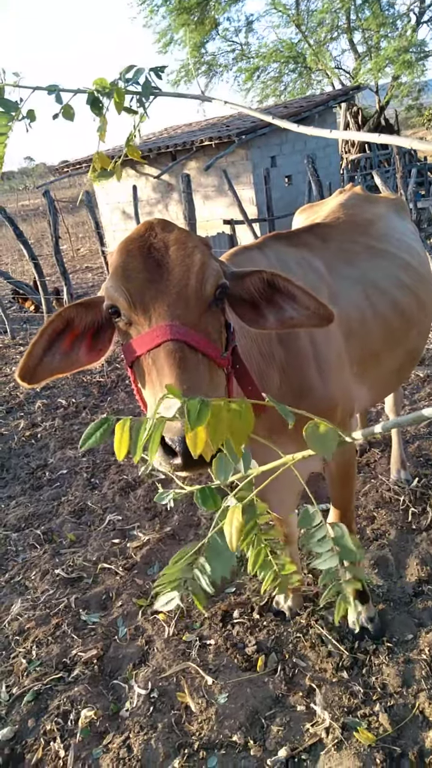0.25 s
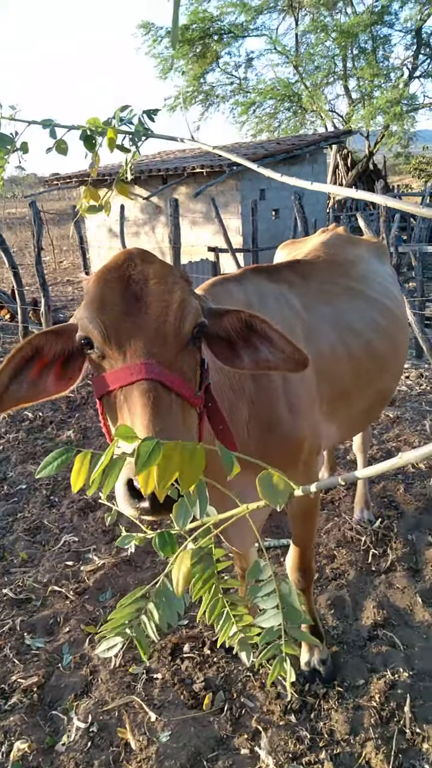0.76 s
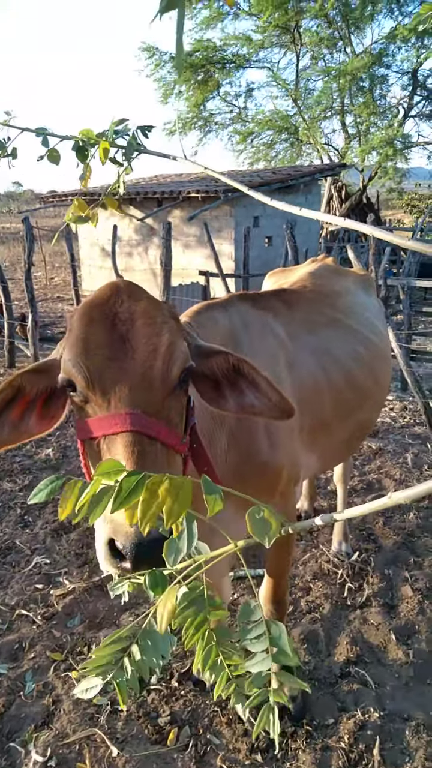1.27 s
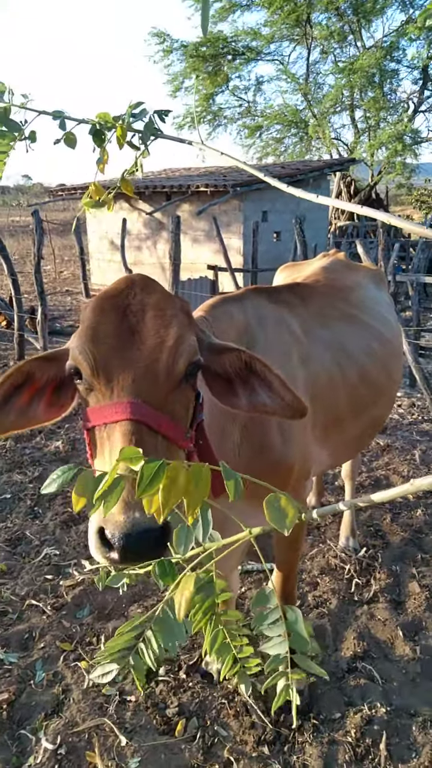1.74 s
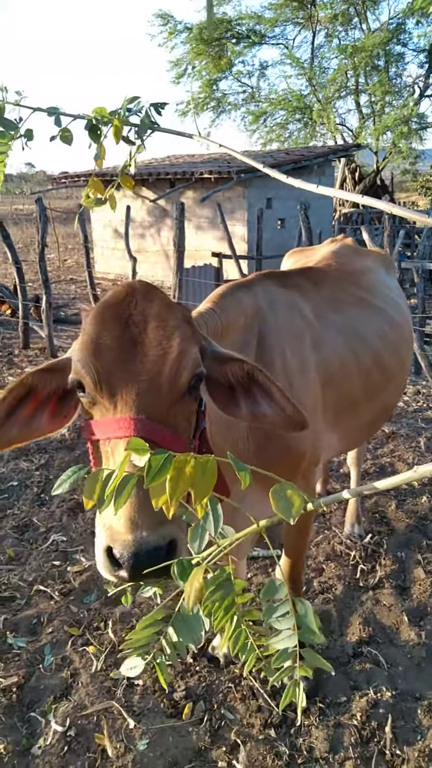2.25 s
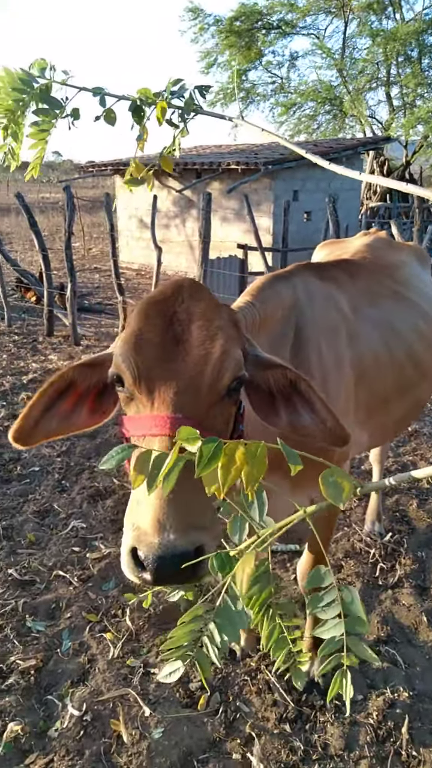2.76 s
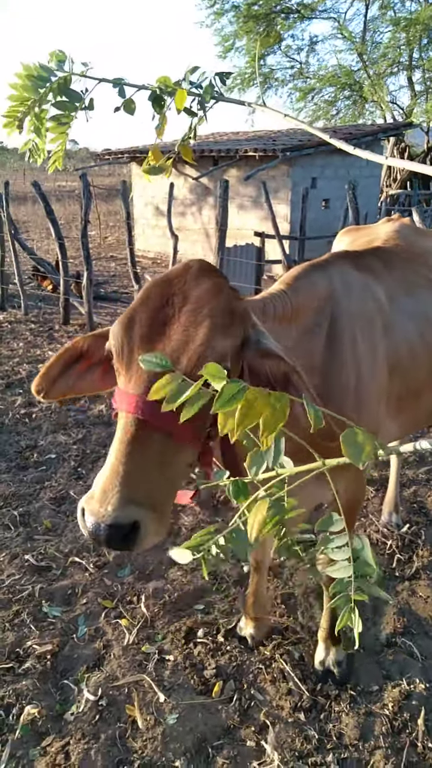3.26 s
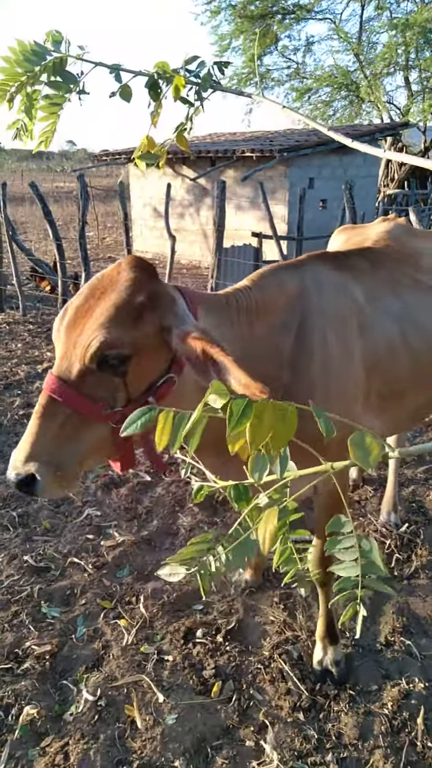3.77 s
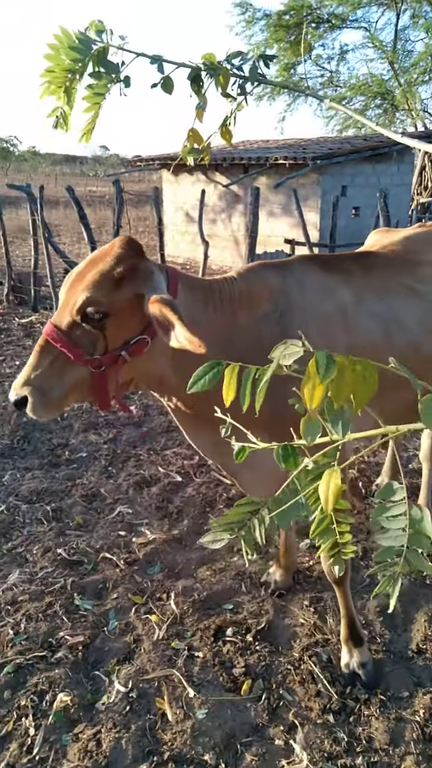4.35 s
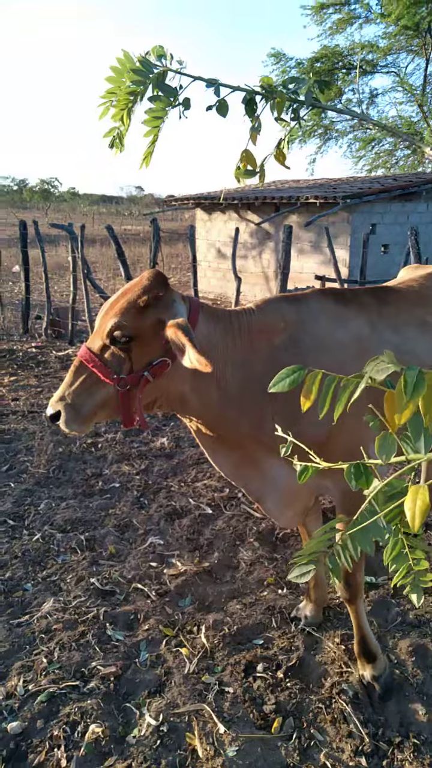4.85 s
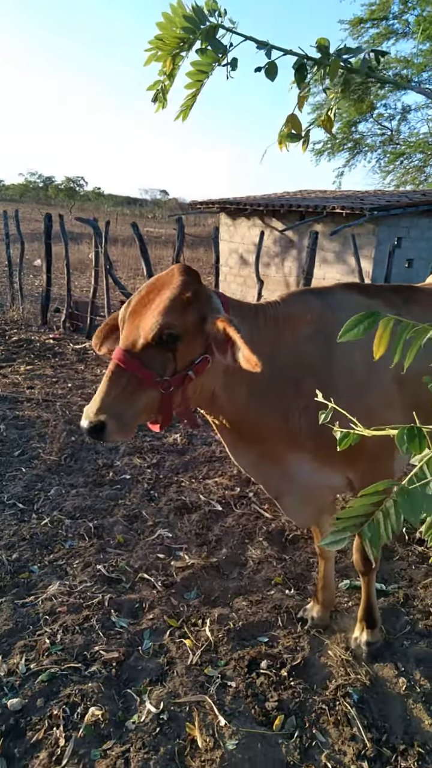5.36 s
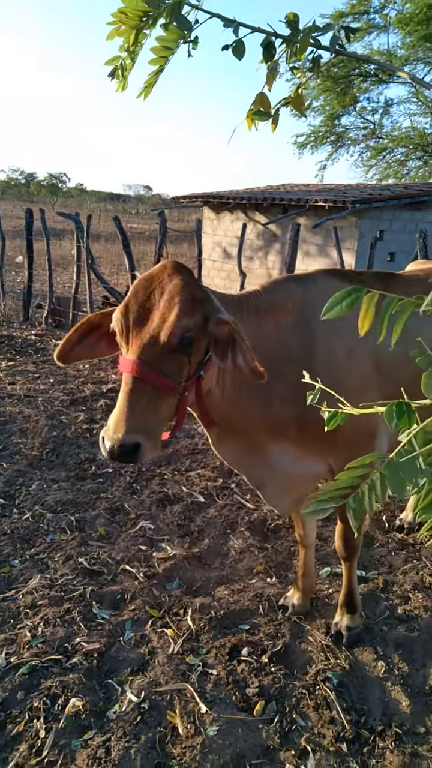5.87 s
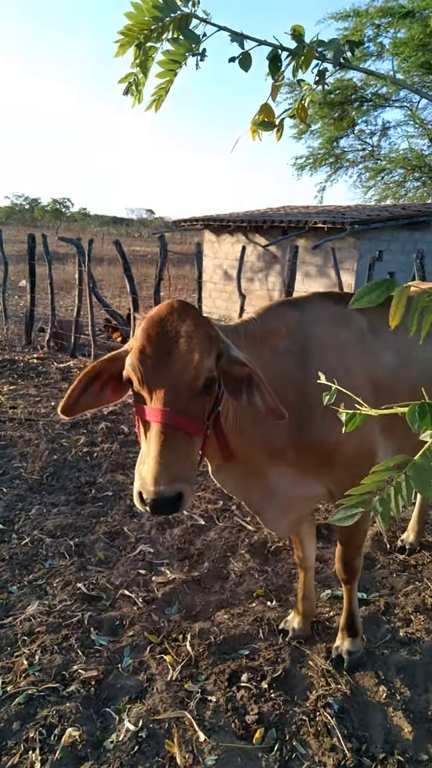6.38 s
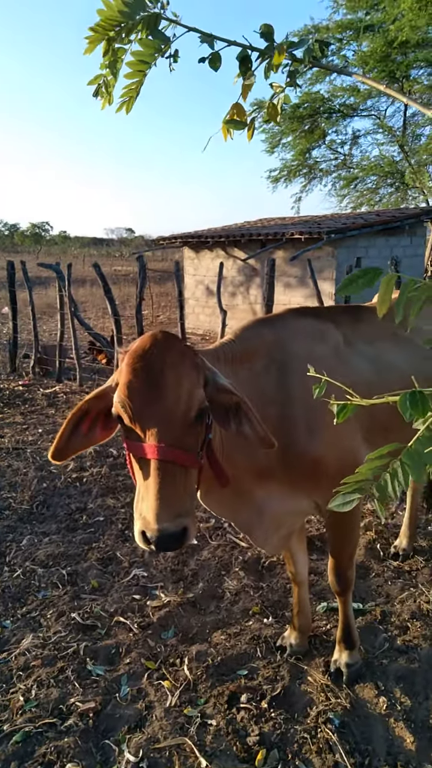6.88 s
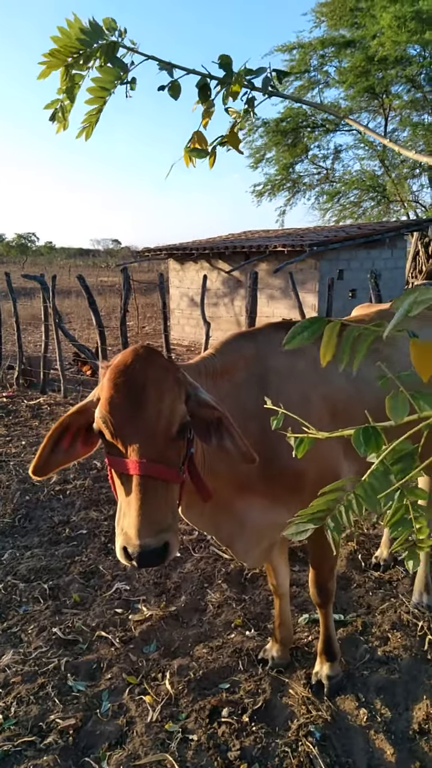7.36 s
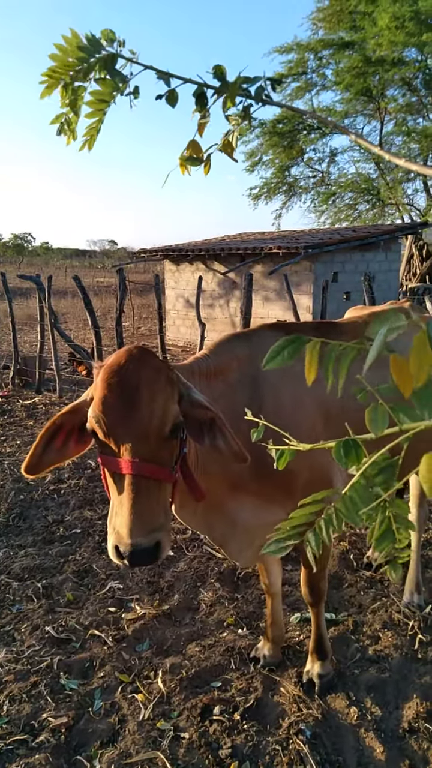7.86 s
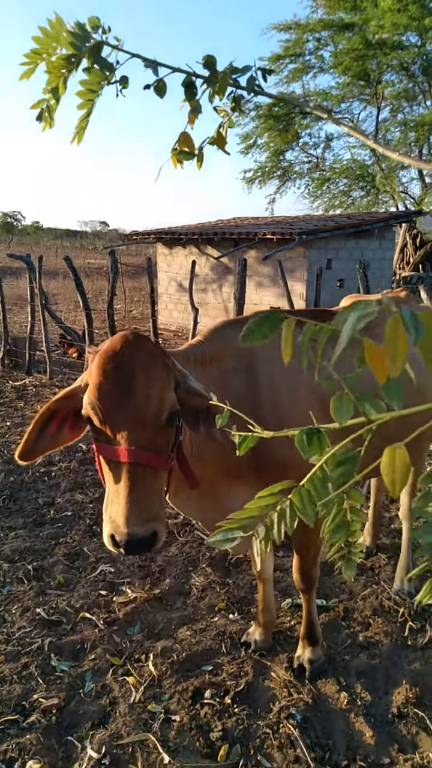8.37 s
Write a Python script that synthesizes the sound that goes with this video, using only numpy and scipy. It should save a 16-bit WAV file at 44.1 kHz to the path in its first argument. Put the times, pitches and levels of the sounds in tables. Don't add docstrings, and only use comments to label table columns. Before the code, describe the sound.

Dry leaves crackle and stems knock beside a wind-buffeted phone microphone as an accelerating bird trill and buzzing calls echo from trees.

```python
import sys
import numpy as np
from scipy import signal
from scipy.fft import rfft, irfft, next_fast_len
from scipy.io import wavfile
from scipy.ndimage import uniform_filter1d

SR = 44100
rng = np.random.default_rng(int(sys.argv[2]) if len(sys.argv) > 2 else 0)


def boost_factor(decibels):
    exponent = np.asarray(decibels, float) / 20
    return 10 ** exponent


def put_to_file(sound):
    columns = np.atleast_2d(sound).T
    safe = np.clip(columns, -1, 1)
    whole_steps = np.round(safe * 32767)
    wavfile.write(sys.argv[1], SR, whole_steps.astype(np.int16))


N = 380141


def colour(x, points):
    size = next_fast_len(len(x))
    hz, db = np.transpose(points)
    bins_hz = np.arange(size // 2 + 1) * SR / size
    gain = boost_factor(np.interp(np.log(bins_hz + 1), np.log(hz), db, -120, -120))
    return irfft(rfft(x, size) * gain, size)[:len(x)]


def band(x, lo_hz, hi_hz, order=2):
    return signal.sosfilt(signal.butter(order, [lo_hz, min(hi_hz, .45 * SR)], "band", fs=SR, output="sos"), x)


def unit(x):
    return x / np.sqrt(np.mean(x ** 2))


def walk(rate):
    k = int(SR / rate)
    steps = np.repeat(rng.standard_normal(N // k + 1), k)
    return unit(uniform_filter1d(steps, k)[:N])


def add(out, s, sound):
    i = max(int(s * SR), 0)
    out[i:i + len(sound)] += sound[:N - i]


def swells(rows, rise_db_s, fall_db_s, rest_db):
    t = np.arange(0, N + 64, 64) / SR
    s, hold, db = np.transpose(rows)[:3, :, None]
    before, after = np.clip(s - t, 0, None), np.clip(t - s - np.abs(hold), 0, None)
    db = db - rise_db_s * before - fall_db_s * after
    return boost_factor(np.vstack([rest_db + 0 * t, db])) ** 2


def spread(v):
    return np.interp(np.arange(N) / 64, np.arange(len(v)), v)


def total_db(power):
    return spread(10 * np.log10(power.sum(axis=0)))


def leaves(db, bright_db, ring_hz):
    # frequency in Hz, density in dB per Hz.
    leaf = [(1200, -19.5), (1550, -14), (2000, -14.5), (3000, -10.5), (4200, -10.5), (6000, -4.5),
            (7900, -4), (11000, -7), (15900, -6)]
    bursts_db = 1.6 * rng.exponential(size=N // 40 + 1).clip(0, 6).repeat(40)[:N]
    grains = boost_factor(bursts_db + .8 * walk(45))
    hz, s, cells = signal.stft(unit(grains * rng.standard_normal(N)), SR, nperseg=512)
    at = np.minimum((s * SR).astype(int), N - 1)
    db, bright_db, ring_hz = db[at], bright_db[at], ring_hz[at]
    hz = hz[:, None]

    quiet = np.clip((-56.0 - db) / 11, 0, 1)
    treble_db = (bright_db + 5.0) * np.clip((hz - 9000) / 3000, 0, 1)
    sunk_db = 11 * quiet * np.clip((6500 - hz) / 2500, 0, 1)

    luck = uniform_filter1d(rng.standard_normal((65, len(s))), size=22, axis=1)
    luck = unit(luck + .8 * uniform_filter1d(luck, size=5, axis=0))
    luck = luck.repeat(4, axis=0)[:len(hz)]
    ring = np.exp(-(np.log((hz + 1) / ring_hz) / 0.12) ** 2)
    streak_db = (2 + 10.9 * quiet) * (np.tanh(3 * luck + 2.77 * ring) - .6) + 3.6 * ring

    leaf_hz, leaf_db = np.transpose(leaf)
    shape_db = np.interp(np.log(hz + 1), np.log(leaf_hz), leaf_db, -60, -60)
    level_db = db + shape_db + treble_db - sunk_db + streak_db + 7.5
    return signal.istft(cells * boost_factor(level_db), SR)[1][:N]


def snaps():
    # time in seconds, level
    # in dB, # dull part in dB, ring in Hz.
    ticks = [(1.22, -55, -9, 9300), (2.443, -55, -2, 6960), (2.686, -71, -20, 5330),
             (2.733, -70, -18, 5250), (3.656, -45.5, -31, 12500), (3.711, -45, -18, 7400),
             (3.998, -29, -9, 8700), (4.309, -54, -10, 8400), (4.557, -43, -20, 8560),
             (4.851, -60, -18, 7560), (4.866, -46, -18, 8300), (4.902, -49, -13, 8000),
             (4.938, -44, -5.5, 9900), (4.988, -40.5, -13, 7600), (5.064, -41, -13, 9700),
             (5.098, -47.5, -22, 9700), (5.303, -56, -28, 8800), (6.328, -46, -35, 8700),
             (6.339, -46, -35, 8750), (6.596, -53, -11, 6960), (7.073, -63, -25, 8500),
             (7.563, -49, -18, 7400), (7.564, -45, -6, 6960), (7.605, -42, -8, 7600),
             (7.821, -57, -25, 12000), (7.921, -55, -22, 12500), (8.268, -44.5, -8, 9000),
             (8.473, -45, -22, 5600), (8.55, -39, -18, 8300), (8.584, -42.5, -11, 6660),
             (8.608, -41, -25, 8800), (8.616, -39.5, -14, 6300)]
    out, t = np.zeros(N), np.arange(300) / SR
    noises = rng.standard_normal((len(ticks), len(t)))
    for (s, db, dull_db, ring_hz), noise in zip(ticks, noises):
        crack = noise * (1 - np.exp(-t / .0003)) * np.exp(-t / 0.0015)
        ring = unit(band(crack, ring_hz / 1.186, ring_hz * 1.175, order=3))
        bright = .42 * unit(band(crack, 4600, 15500))
        dull = boost_factor(dull_db) * unit(band(crack, 1700, 6800))
        add(out, s - .0007, boost_factor(db - 7.5) * (ring + bright + dull))
    return out


def branch(db):
    # time in seconds, level in dB, hardness in dB.
    knocks = [(0.134, -51.5, -32), (0.287, -63, -28), (.396, -69, -28), (0.476, -49.5, -43.5),
              (1.024, -66, -5), (1.221, -40, -23), (2.415, -57, -29), (2.444, -65.5, -12),
              (2.529, -46, -42), (2.536, -50.5, -32), (2.564, -40, -45), (2.603, -37, -46),
              (2.643, -44, -41), (2.687, -44, -32), (2.734, -37, -43.5), (2.763, -43, -35),
              (2.795, -42, -40), (3.448, -65.5, -38), (3.502, -57.5, -33), (3.999, -45, -15.5),
              (4.017, -54.5, -15.5), (4.172, -50, -35.5), (4.249, -42.5, -31), (4.285, -43.5, -18.5),
              (4.312, -44, -17.5), (4.524, -52, -35), (4.558, -50.5, -18), (4.936, -62, -7),
              (5.069, -60.5, -23), (5.122, -60.5, -21), (7.197, -64.5, -12)]
    out = boost_factor(db - 9.0 + 5.5 * walk(30)) * unit(band(rng.standard_normal(N), 130, 776, order=4))
    t = np.arange(900) / SR
    for (s, knock_db, hard_db), (pitch, side) in zip(knocks, rng.random((len(knocks), 2))):
        push = 1 - np.exp(-(t * boost_factor(0.64 * hard_db) / 0.00022) ** 2)
        low = np.sin(2 * np.pi * (260 + 90 * pitch) * t) * np.exp(-t / 0.0017)
        wood = 0.35 * np.sin(2 * np.pi * (470 + 100 * side) * t) * np.exp(-t / 0.0023)
        high = np.sin(2 * np.pi * (1350 + 400 * pitch) * t) * np.exp(-t / 0.0017)
        hard = boost_factor(1.38 * hard_db + 8.0) * (1 - np.exp(-t / 0.00012)) * high
        add(out, s - .001, boost_factor(knock_db + 16.5) * np.sign(side - .5) * ((low + wood) * push + hard))
    return out


def wind(db):
    # time in seconds, level in dB, swing in Hz.
    puffs = [(0.187, -45.5, 85), (0.24, -45, 88), (0.307, -42, 84.4), (0.359, -54, 99.5),
             (0.451, -44.5, 78), (0.473, -33.5, 109), (0.613, -37.5, 95), (0.644, -41, 80),
             (0.749, -44.5, 70), (.795, -43, 86), (0.825, -45, 96), (0.854, -47.5, 90), (1.023, -51, 96),
             (1.194, -37.5, 89.5), (1.243, -40, 102), (1.259, -40.5, 113), (1.808, -40.5, 114),
             (2.126, -44.5, 68), (2.418, -53, 66), (3.058, -35.5, 99), (3.241, -46.5, 65), (3.254, -47, 80),
             (3.545, -46.5, 72), (3.665, -55.5, 72), (3.822, -51.5, 73.5), (4.284, -50.5, 150),
             (4.975, -48, 71), (5.059, -49.5, 80), (5.18, -43.5, 70), (5.232, -43.5, 70.7),
             (5.776, -54, 75), (8.187, -44.5, 100), (8.224, -43.5, 81), (8.338, -39.5, 89),
             (8.352, -43, 110), (8.379, -45.5, 80), (8.431, -48.5, 65)]
    # frequency in Hz, density in dB per Hz.
    port = [(15, -29), (30, -18), (70, 1.5), (97, 1), (240, -19), (430, -39), (900, -63.5)]
    out = boost_factor(db + 3.8 * walk(24)) * unit(colour(rng.standard_normal(N), port))
    t = np.arange(-1500, 1500) / SR
    for (s, blow_db, swing_hz), turn in zip(puffs, rng.random(len(puffs))):
        swing = np.exp(-(t / 0.0058) ** 2) * np.cos(2 * np.pi * (swing_hz * t + turn))
        add(out, s + t[0], boost_factor(blow_db + 2.5) * swing)
    return out


def singer():
    # start in seconds, length in seconds, top pitch in Hz, level in dB.
    notes = [(1.452, 0.02, 1570, -79.5), (1.532, 0.025, 1650, -78), (1.628, 0.024, 1540, -75.5),
             (1.734, 0.023, 1580, -78.5), (2.834, 0.093, 2297, -72), (3.209, 0.133, 2300, -66.5),
             (3.713, 0.137, 2280, -63), (4.197, 0.12, 2321, -57), (4.599, 0.15, 2230, -62.5),
             (5, 0.12, 2218, -62.5), (5.393, 0.118, 2130, -61.5), (5.745, 0.11, 2183, -60.5),
             (6.064, 0.1, 2204, -60.5), (6.364, 0.105, 2170, -61), (6.676, 0.105, 2115, -62),
             (6.97, 0.098, 2180, -61), (7.233, 0.093, 1930, -62), (7.469, 0.074, 1900, -62),
             (7.654, 0.068, 1800, -60), (7.833, 0.051, 1733, -56), (7.966, 0.033, 1603, -59),
             (8.087, 0.032, 1585, -59), (8.174, 0.031, 1516, -60), (8.292, 0.035, 1440, -63),
             (8.382, 0.022, 1364, -67.5), (8.444, .018, 1210, -75)]
    arch = [(0, .6), (.1, .87), (.2, 1.0), (.45, .93), (.86, .83), (1, .58)]
    pickup_from_s = 5.2
    out = np.zeros(N)
    for s, length, hz, db in notes:
        share = np.linspace(0, 1, int(length * SR))
        hump = np.interp(length, [.04, .08], [1, 0])
        arched = np.interp(share, *np.transpose(arch))
        rounded = 1 - 0.883 * (share - .4) ** 2
        phase = 2 * np.pi * np.cumsum(hz * ((1 - hump) * arched + hump * rounded)) / SR

        top = np.interp(length, [.07, .1], [.9, .2])
        swell = np.interp(share, [0, .07, .16, .42, .5, .93, 1], [0, .3 + top, top, top, 1, .8, 0])
        if s < pickup_from_s and length > .07:
            swell = np.interp(share, [.24, .32, .5, .93, 1], [0, .45, 1, .8, 0])
        swell = swell * np.sin(np.pi * share) ** (hump / 2)

        octave = (0.21 + 95 * length ** 2) * boost_factor(0.92 * (db + 62.0))
        mouth = np.interp(share, [0, .05, .12, .2, .4, .5, .85, 1], [0, .3, 1, .25, .3, 1, .8, .1])
        second = octave * np.maximum(mouth, hump) * np.sin(2 * phase)
        third = .004 * octave ** 4 * np.sin(3 * phase)
        add(out, s, boost_factor(db + 2.5) * swell * (np.sin(phase) + second + third))
    return out * (boost_factor(1.8 * walk(90)) + .33 * walk(400))


def buzzer():
    # start in seconds, length in seconds, throat resonance in Hz, level in dB,
    # high resonance in dB.
    buzzes = [(0.288, 0.11, 3650, -68, -30), (0.42, 0.039, 3660, -84, -24), (0.756, 0.13, 3935, -66, -24),
              (1.262, 0.11, 3150, -60, -16), (1.437, 0.026, 3260, -65, -28),
              (1.528, 0.015, 3250, -61.5, -22), (1.623, 0.026, 3253, -64, -37),
              (1.733, 0.022, 3120, -66.5, -34), (1.765, 0.086, 3130, -56.5, -20.5),
              (1.946, 0.026, 3236, -62, -18), (2.065, 0.029, 3080, -61, -13),
              (2.231, 0.23, 3140, -58, -14.5), (2.632, 0.028, 3300, -63, -24),
              (2.758, 0.15, 3100, -56.5, -22.5), (3.247, 0.086, 3146, -54.5, -21),
              (3.674, 0.2, 2910, -58, -11), (4.182, 0.083, 2915, -55.5, -2.5),
              (4.608, 0.15, 2960, -59, -12.5), (5.095, 0.066, 2975, -58, -12),
              (5.537, 0.074, 3040, -54, -22), (5.988, 0.087, 3010, -54.5, -17.5),
              (6.449, 0.073, 2980, -56, -24), (6.911, 0.1, 2950, -60.5, -11),
              (7.368, 0.092, 3000, -58, -13), (7.844, 0.11, 2850, -66, -0.5),
              (8.268, 0.094, 2900, -69, -20)]
    out = np.zeros(N)
    cycle = np.cumsum(337 * (1 + .006 * walk(6) + .011 * walk(150))) / SR
    pulses = np.diff(np.floor(cycle), prepend=0) * boost_factor(2.8 * walk(200))
    source = unit(pulses) + 0.5 * np.exp(-(cycle % 1) / 1.3) * rng.standard_normal(N)
    for s, length, hz, db, high_db in buzzes:
        i, t = int(s * SR), np.arange(int(length * SR)) / SR
        raw = source[i:i + len(t)]
        throb = 1 + .3 * np.sin(2 * np.pi * 56 * t)
        breath = raw * np.sin(np.pi * t / length) ** 1.3 * throb
        voice = band(breath, hz - 130, hz + 130, order=2)
        voice = voice + 0.5 * band(breath, hz + 200, hz + 500, order=2)
        voice = voice + 0.2 * band(breath, hz - 300, hz + 850, order=5)
        voice = voice + boost_factor(high_db) * band(breath, 5070, 5650, order=4)
        opening = t / 0.0099 * np.exp(1 - t / 0.013) * band(raw, hz + 700, hz + 1700, order=3)
        add(out, s, boost_factor(db) * unit(voice + .05 * opening))
    return out


def whistler():
    # start in seconds, length in seconds, first pitch in Hz, last pitch in Hz, level in dB.
    whistles = [(0.0, 0.16, 3700, 3550, -75.5), (0.585, 0.05, 2944, 3060, -80.5),
                (0.52, 0.021, 4120, 4030, -89), (0.62, 0.015, 1620, 1790, -81.5),
                (0.703, 0.018, 1710, 1750, -82.5), (5.253, 0.034, 2924, 4060, -71),
                (0.918, 0.24, 4050, 3720, -81), (1.084, 0.03, 3730, 3000, -78.5),
                (1.667, 0.047, 3300, 3750, -78.5), (1.712, 0.083, 3730, 3800, -78.5),
                (3.046, 0.034, 3526, 3530, -78.5), (3.107, 0.063, 3680, 3670, -82.5),
                (3.75, 0.037, 3660, 3660, -67), (5.619, 0.23, 4420, 4400, -86),
                (4.106, 0.03, 2510, 2630, -75), (4.129, 0.019, 2600, 3050, -76),
                (4.562, 0.076, 2410, 3300, -74), (5.01, 0.042, 2745, 2440, -69),
                (5.41, 0.04, 2740, 2460, -63.5), (5.762, 0.034, 2700, 2440, -62),
                (6.066, 0.013, 3500, 4000, -64.5), (6.323, 0.038, 2630, 3480, -79.5),
                (1.757, 0.077, 7400, 7480, -85), (8.243, 0.039, 3410, 3110, -72),
                (7.258, 0.021, 2480, 2410, -68), (6.634, 0.048, 2600, 2980, -76),
                (6.671, 0.017, 3000, 3930, -73.5), (6.699, 0.034, 2570, 2430, -63.5),
                (6.806, 0.096, 3950, 3230, -70), (6.882, 0.062, 3250, 2590, -68.5)]
    out, waver_hz = np.zeros(N), 45 * walk(90)
    for s, length, from_hz, to_hz, db in whistles:
        share = np.linspace(0, 1, int(length * SR))
        hz = from_hz + (to_hz - from_hz) * share + waver_hz[int(s * SR):][:len(share)]
        tone = np.sin(2 * np.pi * np.cumsum(hz) / SR)
        add(out, s, boost_factor(db + 10.0) * np.sin(np.pi * share) ** .5 * tone)
    return out * boost_factor(4 * walk(70))


def rasper():
    # start in seconds, length in seconds, first pitch in Hz, last pitch in Hz,
    # level in dB.
    rasps = [(0.12, .05, 3500, 3260, -73.5), (.235, 0.024, 4300, 3500, -77),
             (.31, 0.089, 2300, 1800, -87.5), (.776, 0.075, 2950, 2800, -80), (.778, .06, 5100, 4800, -81),
             (1.005, .12, 1400, 1330, -88), (1.104, 0.03, 3300, 2600, -79), (1.18, .03, 3200, 3500, -79.5),
             (1.225, .1, 1600, 1300, -83), (1.264, 0.024, 4800, 3300, -70), (1.359, .02, 1700, 1400, -83),
             (1.564, 0.041, 5700, 4000, -75), (1.827, 0.065, 5440, 3840, -64.5),
             (1.895, .04, 1000, 980, -82), (2.075, 0.018, 1600, 1500, -78), (2.125, .04, 3300, 2600, -71.5),
             (2.267, 0.024, 1750, 1400, -71), (2.598, .015, 1700, 1470, -79),
             (2.649, 0.022, 1770, 1400, -73), (2.831, 0.07, 5300, 4250, -63),
             (2.879, 0.046, 2000, 1400, -74), (3.225, 0.038, 3830, 2840, -57.5),
             (3.253, 0.017, 4900, 3800, -64), (3.323, 0.055, 5200, 4400, -68),
             (3.517, 0.046, 3160, 3300, -73), (3.66, .05, 1100, 1000, -84), (5.59, 0.069, 5600, 5000, -69),
             (5.81, 0.04, 5750, 5500, -75.5), (6.962, .07, 5500, 4300, -66)]
    out, husk = np.zeros(N), walk(500)
    for s, length, from_hz, to_hz, db in rasps:
        share = np.linspace(0, 1, int(length * SR))
        tone = np.sin(2 * np.pi * np.cumsum(from_hz + (to_hz - from_hz) * share) / SR)
        rough = husk[int(s * SR):][:len(share)] * tone
        add(out, s, boost_factor(db + 7.0) * np.sin(np.pi * share) ** .5 * rough)
    return out


def yard(x, t60, wet_db):
    t = np.arange(SR // 2) / SR
    tail = rng.standard_normal(len(t)) * np.exp(-np.log(1000) * t / t60) * np.clip(t / 0.02, 0, 1)
    tail = tail / np.sqrt(np.sum(tail ** 2))
    blurred = x * (.25 + .75 * walk(200) + .6 * walk(600))
    return x + boost_factor(wet_db) * signal.fftconvolve(blurred, tail)[:N]


def hiss():
    # frequency in Hz, density in dB per Hz.
    floor = [(250, -14), (500, -19), (1100, -20.5), (3000, -25), (6000, -24.5), (15500, -24)]
    return boost_factor(-87.5) * unit(colour(rng.standard_normal(N), floor))


def scene():
    # full strength at in seconds, hold in seconds, level in dB, brightness in dB,
    # leaf ring in Hz.
    rustles = [(0.261, 0.11, -69.5, 1.5, 7800), (1.118, 0.016, -68, -1.5, 9500),
               (1.22, 0.028, -78, -10.5, 9700), (1.888, 0.042, -54, -4.5, 9500),
               (2.025, 0.24, -75, 4, 9650), (2.268, 0.14, -60, -4.5, 7100), (2.733, 0.19, -79, -51, 7640),
               (3.336, 0.26, -68, 1, 8100), (3.667, 0.045, -56.5, -7, 7700), (4.029, 0.075, -59, -5, 7500),
               (4.195, 0.19, -62, -6.5, 8850), (4.355, 0.032, -58, -28, 9300),
               (4.566, 0.03, -66, -13, 9300), (4.716, 0.14, -62, -6, 9300), (4.86, 0.27, -55.5, -4, 9600),
               (5.174, 0.027, -59.5, -20, 9100), (5.3, 0.091, -68.5, -10.5, 8700),
               (5.553, 0.33, -78, -13, 8300), (5.903, 0.11, -65, -8.5, 7900), (6.066, 0.23, -60, -10, 7830),
               (6.357, 0.18, -64.5, -8, 8000), (6.556, 0.049, -56.5, -7, 7740),
               (6.67, 0.19, -63.5, -7.5, 7960), (6.906, 0.22, -74, -5.5, 8300),
               (7.194, 0.077, -76, -15, 7950), (7.456, 0.069, -70, -18, 7540),
               (7.565, 0.11, -52, -9.5, 7240), (7.62, 0.15, -56.5, -3.5, 7500),
               (7.824, 0.33, -51.5, -5.5, 7550), (8.203, .5, -52.5, -6, 7580)]
    # full strength at in seconds, hold in seconds, level in dB.
    rubs = [
        (1.2, 0.094, -68),
        (.5, .03, -81),
        (2.42, 0.052, -67.5),
        (2.66, 0.16, -80),
        (3.66, 0.15, -75),
        (4.0, 0.048, -65.5),
        (4.26, 0.12, -60),
        (4.6, 0.011, -63),
        (5.05, 0.17, -75),
        (6.6, 0.0058, -80),
    ]
    # full strength at in seconds, hold in seconds, level in dB.
    gusts = [(0, 0.012, -54.5), (.2, 0.44, -56.5), (.5, 0.13, -60), (.78, 0.0078, -51.5), (1.0, 0.019, -65),
             (1.2, 0.11, -56.5), (1.5, 0.0071, -59), (1.85, 0.056, -50), (2.1, 0.59, -64.5),
             (2.72, 0.13, -65), (3.08, 0.16, -55), (3.5, 0.017, -54.5), (4.0, 0.03, -56.5),
             (4.3, 0.076, -62.5), (4.57, 0.025, -54), (5.0, 0.035, -58), (5.2, 0.022, -54),
             (5.56, 0.069, -72), (5.78, 0.043, -61.5), (6.05, 0.029, -68.5), (6.6, 0.2, -90.5),
             (7.2, 0.21, -67), (7.8, 0.0047, -64), (8.05, 0.12, -62), (8.2, 0.21, -57), (8.6, .02, -59.5)]
    shaken = swells(rustles, rise_db_s=484, fall_db_s=191, rest_db=-99)
    rubbed = swells(rubs, rise_db_s=530, fall_db_s=168, rest_db=-94)
    blown = swells(gusts, rise_db_s=130, fall_db_s=102, rest_db=-73.5)

    colours = np.vstack([(-5, 8000), np.array(rustles)[:, 3:]])
    bright_db, ring_hz = (spread(c @ shaken / shaken.sum(axis=0)) for c in colours.T)

    near = leaves(total_db(shaken), bright_db, ring_hz)
    near = near + yard(snaps(), t60=0.09, wet_db=-11.0) + branch(total_db(rubbed))
    birds = yard(singer() + whistler(), t60=0.32, wet_db=-7.0)
    birds = birds + yard(buzzer(), t60=0.37, wet_db=-1.5) + yard(rasper(), t60=0.25, wet_db=-4.5)
    return (near + wind(total_db(blown)) + birds + hiss())[None]


def band_limit(x):
    return signal.sosfilt(signal.butter(12, 16960, fs=SR, output="sos"), x)


def record(dry):
    # start in seconds, end in seconds.
    lifts = [(.281, .372), (.38, .409), (.431, .724), (.739, .77), (.782, .853), (1.178, 1.346),
             (1.798, 2.002), (3.048, 3.168), (3.23, 3.263), (3.538, 3.569), (3.65, 3.696), (3.706, 3.716),
             (3.995, 4.08), (4.245, 4.372), (4.554, 4.58), (4.96, 5.146), (5.165, 5.21), (5.222, 5.271),
             (7.56, 7.59), (7.65, 7.712), (7.818, 8.62)]
    trips = [.181, .235, 1.019, 2.117, 2.339, 2.791, 2.812, 2.831, 4.847, 4.895, 4.933, 6.035, 6.498]
    brief_trips = [2.31, 2.44, 2.684, 2.731, 2.883, 3.315, 3.449, 3.498, 4.594, 5.19, 5.555, 5.588, 6.022]
    flicks = [1.792, 3.295, 3.372, 3.427, 3.584, 3.76, 3.787, 3.823, 4.679, 4.695, 4.71, 5.775, 6.056,
              6.267, 6.326, 6.338, 6.378, 6.558, 6.595, 6.661, 7.195]
    spans = list(lifts)
    for peaks, hold_s in [(trips, .014), (brief_trips, .005), (flicks, .0017)]:
        spans += [(s, s + hold_s) for s in peaks]
    lift_db = np.zeros(N)
    for start, end in spans:
        lift_db[int(start * SR):int(end * SR)] = 11
    gain = boost_factor(uniform_filter1d(lift_db, size=110))
    top_cut = signal.ellip(8, .2, 60, 15850, fs=SR, output="sos")
    return band_limit(signal.sosfilt(top_cut, dry) * gain)


dry = scene()
out = record(dry)
put_to_file(out)
```